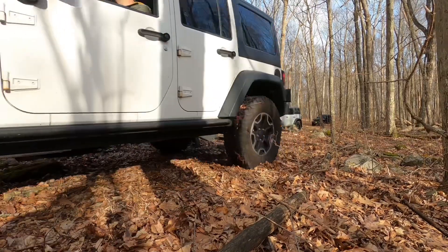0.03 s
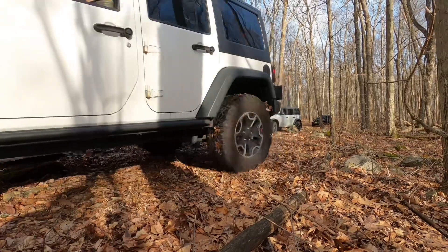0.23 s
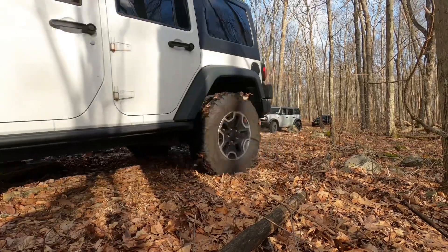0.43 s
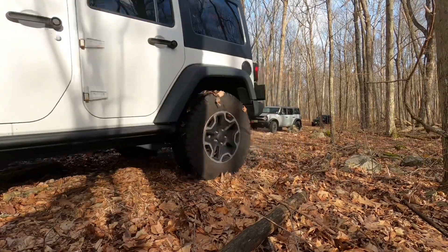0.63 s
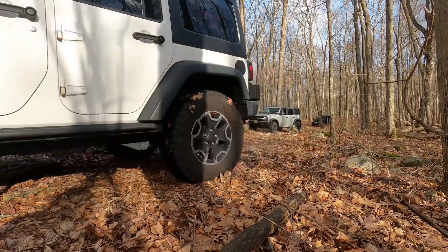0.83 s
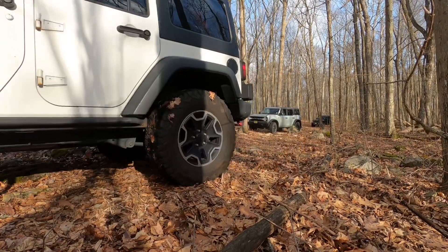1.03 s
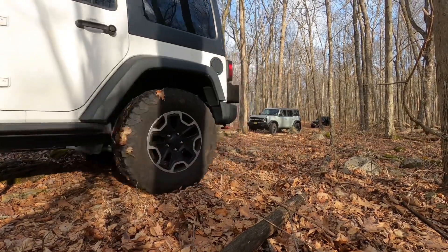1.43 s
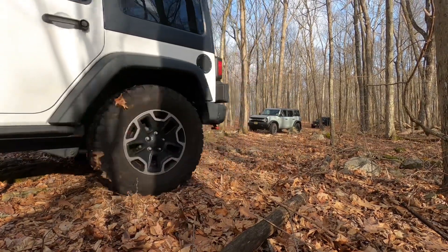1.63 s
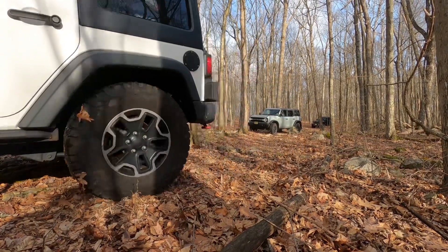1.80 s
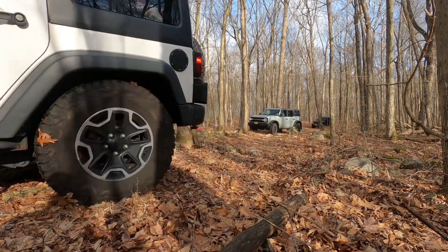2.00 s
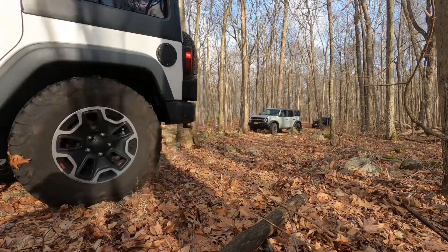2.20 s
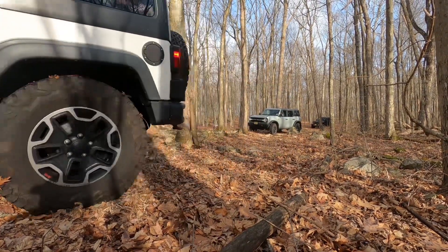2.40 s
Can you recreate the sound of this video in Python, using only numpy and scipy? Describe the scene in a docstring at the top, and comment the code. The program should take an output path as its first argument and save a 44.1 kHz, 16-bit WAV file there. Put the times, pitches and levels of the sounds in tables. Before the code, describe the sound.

Tyres crunch over dry leaves and snap sticks as an off-road vehicle creeps past, engine humming.

```python
"""Dry leaves rustle over a low engine hum: an off-road vehicle creeps past in a wood, barely above idle.
Its tyres rumble, crush the leaves, crack buried sticks and thump over them; a low drone swells briefly.
Leaves are dense tiny fractures, sticks are single breaks with splinters, bumps ring the tyre.
The microphone sounds boxed in, ringing near 1 and 3.4 kHz, and the hardest knocks overload it."""
import sys
import numpy as np
from scipy import signal
from scipy.fft import rfft, irfft
from scipy.io import wavfile

SR = 44100
rng = np.random.default_rng(int(sys.argv[2]) if len(sys.argv) > 2 else 0)


def file_out(sig):
    """Save sig as 16-bit WAV at sys.argv[1]."""
    # one column per channel
    cols = np.atleast_2d(sig).T
    # limit, then scale
    lim = np.clip(cols, -1, 1)
    pcm = np.round(lim * 32767).astype(np.int16)
    wavfile.write(sys.argv[1], SR, pcm)


N = 112454
T = np.arange(N) / SR

# Envelopes: t/s, level/dB
ENGINE_LEVEL = [(0, -47), (.25, -42), (.7, -49), (.9, -51.5), (1.3, -58), (1.7, -45), (2.1, -48.5),
                (2.3, -52.5), (2.55, -54)]
RUMBLE_LEVEL = [(0, -54.5), (.26, -61), (.35, -35.5), (.41, -36.5), (.56, -31.5), (.66, -38.5), (.76, -50),
                (1.15, -53), (1.29, -41), (1.38, -48), (1.5, -45), (1.76, -55), (1.83, -38), (1.95, -46.5),
                (2.2, -41.5), (2.35, -55), (2.55, -55.5)]  # rolling tyres
CRUNCH_LEVEL = [(0, -50.5), (.2, -48), (.29, -48), (.34, -38.5), (.39, -49.5), (.46, -43), (.54, -52),
                (.6, -47.5), (.72, -57), (.83, -51), (.92, -59), (1.12, -53.5), (1.25, -52), (1.38, -53.5),
                (1.5, -50), (1.73, -50.5), (1.82, -47), (2, -51.5), (2.19, -47.5), (2.27, -55), (2.4, -57),
                (2.55, -61.5)]  # litter under the tread
RUSTLE_LEVEL = [(0, -59.5), (.08, -61.5), (.19, -55), (.28, -58), (.33, -52.5), (.39, -56), (.44, -54),
                (.55, -56), (.58, -61.5), (.72, -63), (.84, -67), (.9, -69), (1.1, -64.5), (1.3, -63.5),
                (1.38, -63), (1.47, -58.5), (1.62, -61.5), (1.85, -56), (2, -62), (2.14, -60.5),
                (2.195, -49.5), (2.25, -77.5), (2.32, -67), (2.55, -69)]  # loose leaves on top
# Spectral shapes: f/Hz, relative level/dB
RUMBLE_SPECTRUM = [(10, 0), (28, -15), (60, -0.5), (125, -0.5), (200, -11.5), (300, -17.5), (500, -30.5),
                   (1200, -58), (5000, -105)]
CRUNCH_SPECTRUM = [(30, -3.5), (130, -10), (250, -2.5), (450, -4.5), (720, -2), (840, -4.5), (950, 2.5),
                   (1200, 0.5), (1450, -7.5), (1600, -14), (1900, -9), (2250, -33), (3300, -48),
                   (5000, -59), (16000, -88)]
RUSTLE_SPECTRUM = [(200, -45), (1000, -0.5), (1900, 6), (2300, -9), (2650, -6.5), (3000, 3), (3500, 2.5),
                   (4100, -1), (4800, -3.5), (5500, -10.5), (6500, -13.5), (8000, -25), (10500, -34),
                   (12500, -25.5), (13500, -43), (16000, -28)]
CRACK_SPECTRUM = [(30, -35.5), (150, 4.5), (400, 2.5), (800, 1.5), (1000, 4), (1300, 0.5), (1600, -14),
                  (1950, -10), (2300, -26.5), (3400, -23), (5000, -25), (8000, -52), (12500, -60),
                  (16000, -66)]
SNAP_SPECTRUM = [(200, -10.5), (1100, 20), (1900, 7.5), (2300, 0), (2700, 1.5), (3200, 14), (3900, 6),
                 (5000, 2), (7000, -9), (10000, -21.5), (12500, -19), (14000, -27), (16000, -45)]
# Engine partials, twig modes: frequency ratio, relative level/dB
ENGINE_PARTIALS = [(1, 5.5), (1.5, -1.5), (2, -4.5), (2.5, -6), (3, -5), (3.5, -30), (5, -8.5)]
POP_MODES = [(0.559, -12.5), (.87, -9), (1, 1), (1.23, -12)]
# Low drone: t/s, f/Hz, level/dB
DRONE_TRACK = [(.74, 88, -65), (.83, 88.3, -45.5), (.92, 75.9, -43.5), (1.02, 77.2, -43), (1.1, 76.4, -46),
               (1.22, 77.8, -56)]
# Bumps and breaks: t/s, level/dB, ring f/Hz, decay/s
TYRE_THUMPS = [(0.275, -26.5, 189, 0.0039), (.302, -19.5, 166, 0.0071), (.323, -19.5, 173, 0.0065),
               (0.339, -21, 109, 0.0085), (.43, -40, 109, .012), (0.503, -23.5, 111, 0.012),
               (0.523, -26, 229, 0.017), (.532, -21, 112, 0.012), (0.566, -17.5, 160, 0.0062),
               (0.575, -17.5, 61, 0.0053), (0.627, -13.5, 142, 0.0033), (0.636, -14.5, 175, .007),
               (.637, -23.5, 318, 0.0062), (0.662, -32, 147, 0.013), (1.283, -29.5, 142, 0.01),
               (1.428, -39.5, 199, 0.011), (1.502, -35, 143, 0.016), (1.677, -34.5, 174, 0.005),
               (1.802, -35.5, 293, 0.0051), (1.836, -32.5, 110.5, 0.013), (1.89, -35, 229, 0.013),
               (2.212, -16, 111, 0.0073), (2.24, -18, 108.5, 0.0095), (2.258, -27, 103.5, 0.01)]
WOOD_CRACKS = [(0.239, -44, 1120, 0.014), (.309, -29, 1290, 0.012), (.326, -28.5, 920, 0.01),
               (.335, -37.5, 770, 0.03), (0.426, -39, 720, 0.022), (0.438, -32, 930, 0.0066),
               (.492, -34.5, 1060, 0.036), (.513, -28.5, 930, 0.0098), (0.524, -32, 1050, 0.016),
               (0.538, -36, 1100, 0.0085), (0.549, -29.5, 1170, 0.005), (.557, -26.5, 520, 0.0061),
               (.634, -30, 305, 0.0045), (1.083, -51.5, 480, 0.0038), (1.197, -36.5, 1010, 0.004),
               (1.426, -44, 1030, 0.018), (1.601, -39.5, 1140, 0.0077), (1.676, -47, 950, 0.0028),
               (1.786, -36, 920, 0.0046), (1.804, -39, 290, 0.0099), (1.835, -38.5, 326, 0.0057),
               (1.896, -41.5, 270, 0.0084), (2.206, -22, 713, 0.0058), (2.234, -27.5, 980, 0.0044),
               (2.244, -40, 804, 0.0023), (2.303, -42.5, 1090, 0.017)]
TWIG_POPS = [(.314, -34, 1470, 0.0035), (0.403, -32, 1200, 0.0037), (0.491, -46, 1090, 0.0021),
             (.518, -26.5, 987, 0.0045), (.557, -28.5, 502, 0.01), (.618, -30, 620, 0.0047),
             (.637, -27, 462, 0.0077), (.762, -40.5, 643, 0.0045), (1.169, -39, 780, 0.0039),
             (1.206, -34, 1290, 0.0025), (1.263, -37, 910, 0.0027), (1.266, -34.5, 523, 0.0027),
             (1.428, -45, 1074, 0.0027), (1.49, -35.5, 1150, 0.0035), (1.551, -31, 1350, 0.0041),
             (1.572, -41.5, 735, 0.0056), (1.804, -46.5, 720, 0.0093), (1.838, -38, 905, 0.0031),
             (1.905, -36, 1490, 0.0083), (1.965, -27, 1162, 0.0034), (2.037, -40, 960, 0.0034),
             (2.063, -28, 990, 0.0039), (2.077, -30.5, 943, 0.0024), (2.105, -38.5, 1060, 0.0045),
             (2.184, -30.5, 1117, 0.0058), (2.206, -19.5, 2480, 0.00097)]
# Dry sticks: t/s, level/dB, ring f/Hz
STICK_SNAPS = [(0.5445, -45, 9600), (0.548, -36.5, 3400), (0.5568, -35, 3940), (.592, -45, 4040),
               (.636, -40, 2200), (.798, -41.5, 12000), (0.829, -48, 3720), (.857, -45, 3800),
               (0.958, -49.5, 3380), (1.096, -40.5, 11700), (1.17, -43.5, 8550), (1.295, -48.5, 3220),
               (1.675, -45, 3080), (1.736, -45, 3540), (2.023, -49.5, 12300), (2.195, -40, 3430),
               (2.204, -34.5, 6400), (2.235, -57, 6040), (2.469, -54, 6040)]
# Two microphone ports: f/Hz, left minus right level/dB, left lead/rad, coherence
MIC_PORTS = [(30, 2.6, 0, 1), (200, 2.4, -.08, .995), (520, 3.8, -.35, .98), (900, 5.8, -.1, .985),
             (1200, 5, 0, .98), (1550, 1, -.45, .96), (1900, 3.3, -.6, .93), (2300, 8, -1.3, .6),
             (2950, 8, -1.3, .88), (3400, 8.5, -.75, .88), (3950, 0, -.3, .75), (4350, -3, -3.1, .5),
             (4850, 0, -2.9, .78), (6500, 2, -1.8, .45), (8000, 12, -2, .35), (12400, 18, 0, .5)]

ENGINE_HZ, ENGINE_WANDER = 39.14, 0.0187
THUMP_RISE_S, POP_RISE_S, SNAP_DECAY_S = 0.0013, 0.0014, 0.0014
CRACK_RING_DB, SNAP_RING_DB, RING_WIDTH_OCT = 5, 9.5, 0.16
POP_SPLINTER_DB, SCATTER_DB, SCATTER_S = -8.5, -12.5, 0.025
OVERLOAD_FS, OVERLOAD_KNEE = 0.093, 5
ROLLOFF_HZ, EDGE_HZ = 13800, 15700


def amp(db):
    """Decibels to gain."""
    return 10 ** (np.asarray(db) / 20)


def unit(x):
    """Scale to rms 1."""
    return x / np.sqrt(np.mean(x ** 2) + 1e-20)


def curve(rows, column=1):
    """Time table column at every sample."""
    cols = np.transpose(rows)
    return np.interp(T, cols[0], cols[column])


def spectrum(rows, hz, column=1):
    """Frequency table column, interpolated on a log axis."""
    cols = np.transpose(rows)
    return np.interp(np.log(hz + 1), np.log(cols[0] + 1), cols[column])


def add(mix, start_s, sound):
    """Mix a sound in at start_s."""
    part = mix[round(start_s * SR):][:len(sound)]
    part += sound[:len(part)]


def response(shape, ring_hz=1000, ring_db=0):
    """Minimum-phase impulse response, energy 1, with optional resonance."""
    hz = abs(np.fft.fftfreq(2048, 1 / SR))
    offset_oct = np.log2((hz + 1) / ring_hz)
    db = spectrum(shape, hz) + ring_db * np.exp(-(offset_oct / RING_WIDTH_OCT) ** 2)
    log_response = np.conj(signal.hilbert(np.log(amp(db))))
    impulse = np.fft.ifft(np.exp(log_response)).real
    return impulse / np.linalg.norm(impulse)


def layer(x, shape, level):
    """Filter x, scale to rms 1, apply the envelope."""
    return unit(signal.fftconvolve(x, response(shape))[:N]) * amp(curve(level))


def drift(rate_hz):
    """Slow random motion, rms 1."""
    lowpass = np.exp(-(np.fft.rfftfreq(N, 1 / SR) / rate_hz) ** 2)
    return unit(irfft(rfft(rng.standard_normal(N)) * lowpass, N))


def scatter(x, decay_s):
    """Short, dense tail of reflections."""
    t = T[:SR // 4]
    tail = rng.standard_normal(len(t)) * np.exp(-t / decay_s)
    return signal.fftconvolve(x, tail / np.linalg.norm(tail))[:N]


def engine():
    """Slow engine: low partials wavering in pitch and level."""
    cycles = np.cumsum(ENGINE_HZ * (1 + ENGINE_WANDER * drift(9.05))) / SR
    hum = sum(amp(db + 1.3 * drift(8.3)) * np.sin(2 * np.pi * (ratio * cycles + rng.random()))
              for ratio, db in ENGINE_PARTIALS)
    return unit(hum) * amp(curve(ENGINE_LEVEL))


def drone():
    """Low fluttering tone that swells and fades."""
    tone = np.sin(2 * np.pi * np.cumsum(curve(DRONE_TRACK)) / SR)
    flutter_db = 4.2 * drift(18)
    return unit(tone * amp(flutter_db)) * amp(curve(DRONE_TRACK, column=2))


def leaf_grains(per_s, spread_db, clump_db, clump_hz):
    """Tiny leaf fractures: random impulses, uneven in size, louder in clumps."""
    size_db = spread_db * np.minimum(rng.exponential(1, N), 5) + clump_db * drift(clump_hz)
    return amp(size_db) * rng.choice([-1, 1], N) * (rng.random(N) < per_s / SR)


def tyres():
    """Rolling tread rumbles, crushes litter and stirs loose leaves."""
    rumble = layer(rng.standard_normal(N), RUMBLE_SPECTRUM, RUMBLE_LEVEL)
    litter = leaf_grains(per_s=1800, spread_db=2.5, clump_db=1.5, clump_hz=50)
    crunch = layer(litter, CRUNCH_SPECTRUM, CRUNCH_LEVEL)
    leaves = leaf_grains(per_s=5400, spread_db=3, clump_db=1.36, clump_hz=60)
    rustle = layer(leaves, RUSTLE_SPECTRUM, RUSTLE_LEVEL)
    return rumble + crunch + rustle


def thumps():
    """Each stick or root rings the tyre briefly."""
    out, t = np.zeros(N), T[:SR // 4]
    for start_s, db, hz, decay_s in TYRE_THUMPS:
        envelope = (1 - np.exp(-t / THUMP_RISE_S)) * np.exp(-t / decay_s)
        add(out, start_s, amp(db) * envelope * np.sin(2 * np.pi * hz * t))
    return out


def fracture(decay_s, ring):
    """One break, then a dying spray of splinters; energy proportional to decay_s."""
    t = T[:4096]
    splinters = rng.standard_normal(len(t)) * np.exp(-t / decay_s)
    splinters[0] = 3.1  # initial break
    sound = signal.fftconvolve(splinters, ring)
    return sound / np.linalg.norm(sound) * np.sqrt(decay_s * SR / 2)


def cracks():
    """Rotten wood crumbles under the tread with dull cracks."""
    out = np.zeros(N)
    for start_s, db, hz, decay_s in WOOD_CRACKS:
        add(out, start_s, amp(db) * fracture(decay_s, response(CRACK_SPECTRUM, hz, CRACK_RING_DB)))
    return out


def pops():
    """Twigs splinter and ring hollow in a few close modes."""
    out, t = np.zeros(N), T[:SR // 8]
    for start_s, db, hz, decay_s in TWIG_POPS:
        modes = sum(amp(mode_db) * np.sin(2 * np.pi * hz * ratio * t) for ratio, mode_db in POP_MODES)
        envelope = (1 - np.exp(-t / POP_RISE_S)) * np.exp(-t / decay_s)
        add(out, start_s, amp(db) * modes * envelope)
        splinters = fracture(decay_s, response(CRACK_SPECTRUM, hz, CRACK_RING_DB))
        add(out, start_s, amp(db + POP_SPLINTER_DB) * splinters)
    return out


def snaps():
    """Dry sticks break in the open, short and bright."""
    out = np.zeros(N)
    for start_s, db, hz in STICK_SNAPS:
        add(out, start_s, amp(db) * fracture(SNAP_DECAY_S, response(SNAP_SPECTRUM, hz, SNAP_RING_DB)))
    return out


def scene():
    """All sources reach two ports; the right also gets other tyre noise and reflections."""
    breaks = cracks() + pops() + snaps()
    near = engine() + drone() + tyres() + thumps() + breaks
    near += amp(SCATTER_DB) * scatter(breaks, SCATTER_S)
    aside = tyres() + scatter(breaks, decay_s=0.00067)
    hz = np.fft.rfftfreq(N, 1 / SR)
    balance_db, lead_rad, coherence = (spectrum(MIC_PORTS, hz, column) for column in (1, 2, 3))
    left = rfft(near) * amp(balance_db / 2)
    blend = coherence * rfft(near) + np.sqrt(1 - coherence ** 2) * rfft(aside)
    right = blend * amp(-balance_db / 2) * np.exp(-1j * lead_rad)
    return irfft([left, right], N)


def record(dry):
    """Soft microphone overload, treble roll-off, band limit."""
    limited = dry / (1 + abs(dry / OVERLOAD_FS) ** OVERLOAD_KNEE) ** (1 / OVERLOAD_KNEE)
    dulled = signal.sosfilt(signal.butter(6, ROLLOFF_HZ, fs=SR, output="sos"), limited)
    band_limit = signal.firwin(511, EDGE_HZ, window=("kaiser", 9), fs=SR)
    return signal.oaconvolve(dulled, band_limit[None], "same")


dry = scene()
out = record(dry)
file_out(out)
```